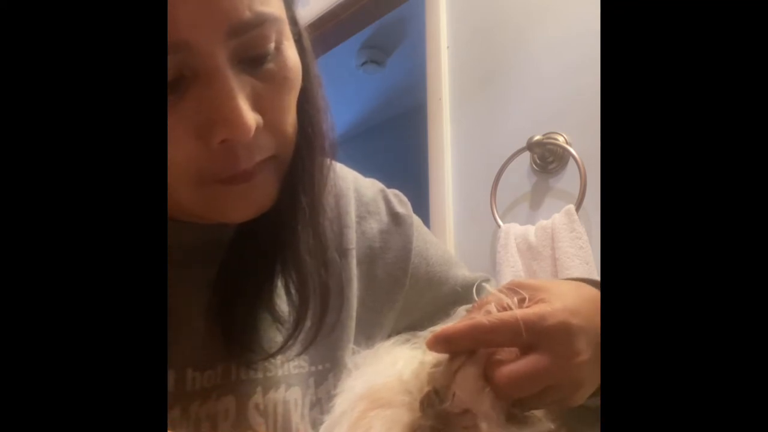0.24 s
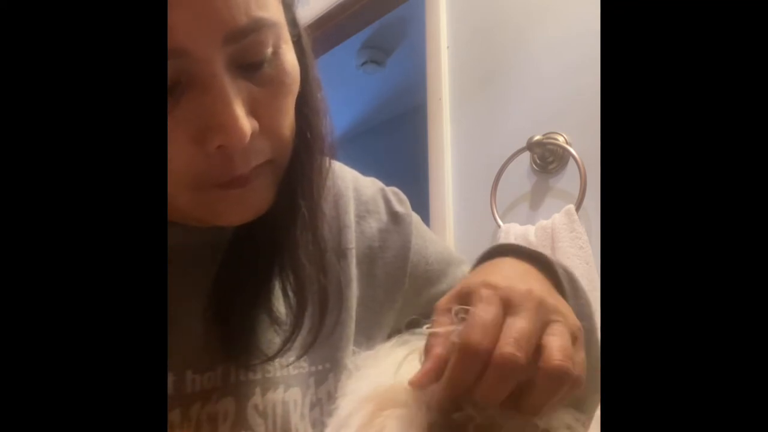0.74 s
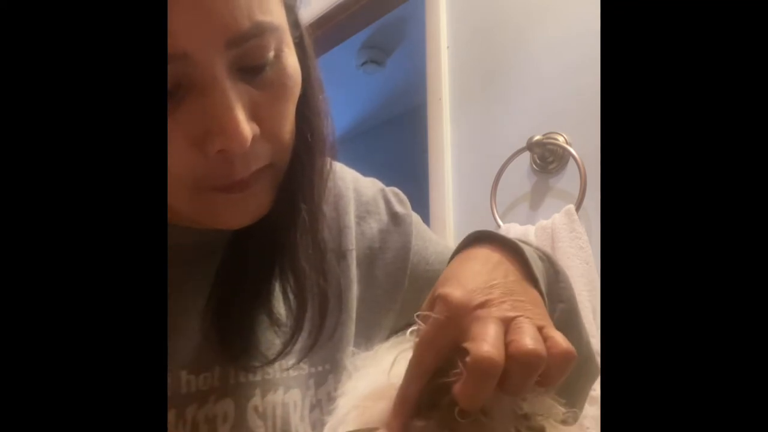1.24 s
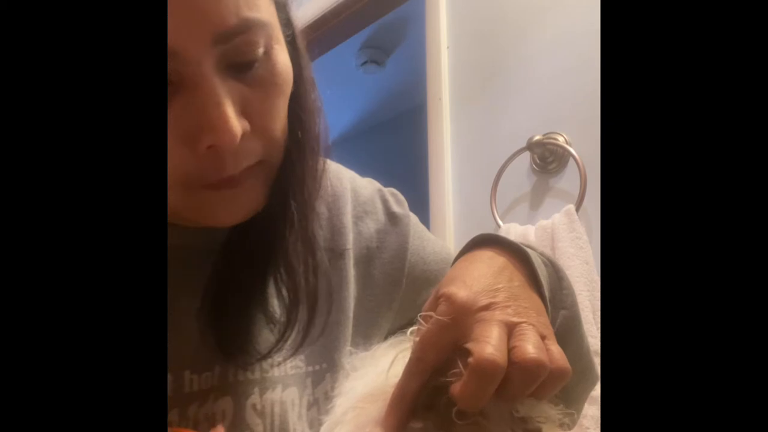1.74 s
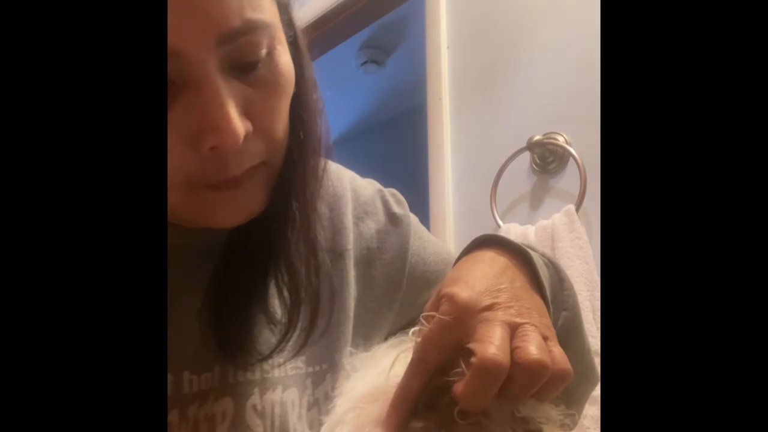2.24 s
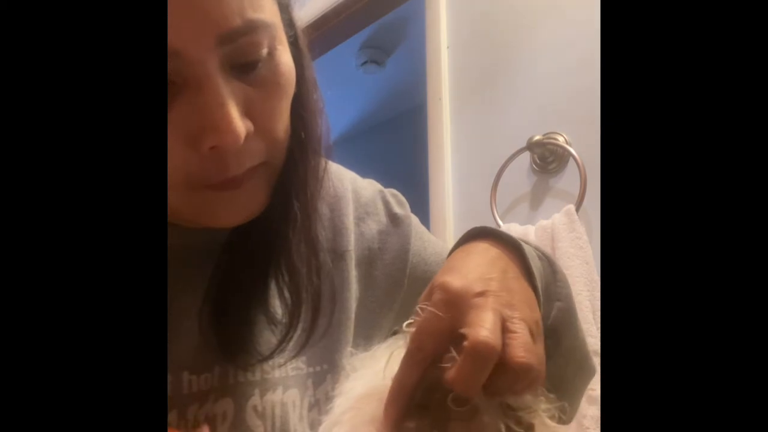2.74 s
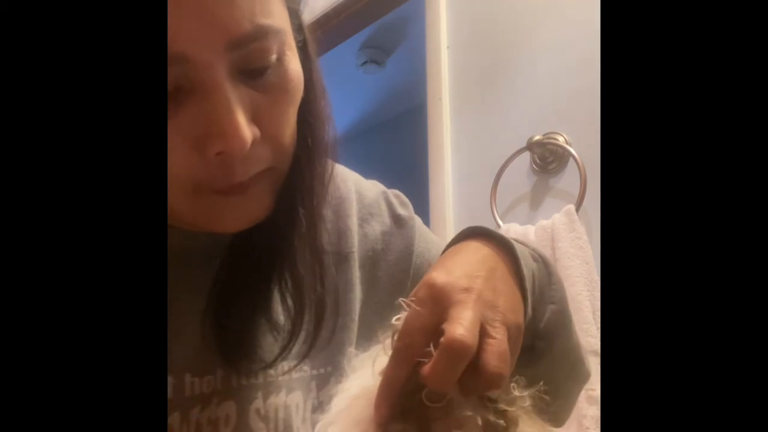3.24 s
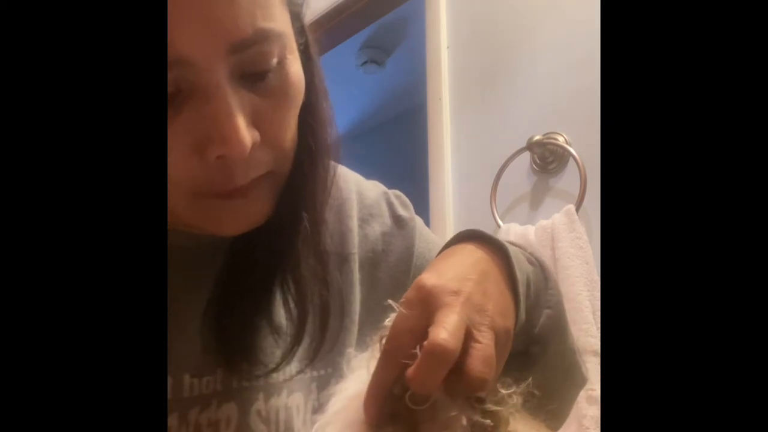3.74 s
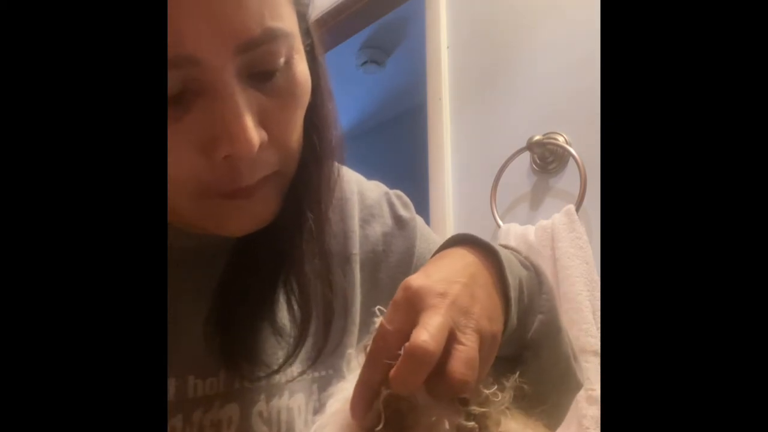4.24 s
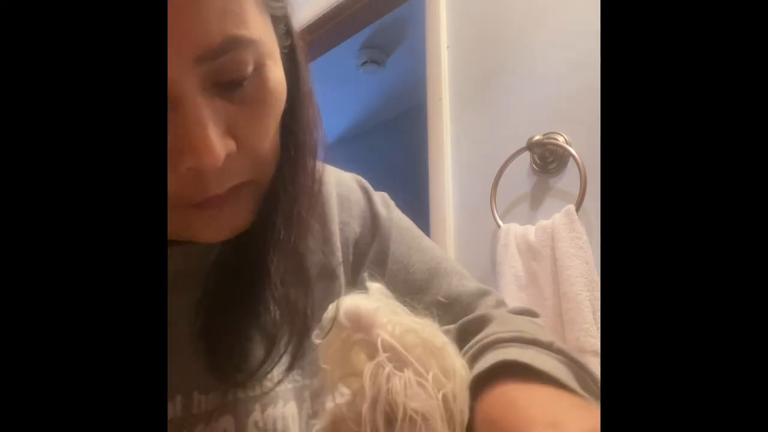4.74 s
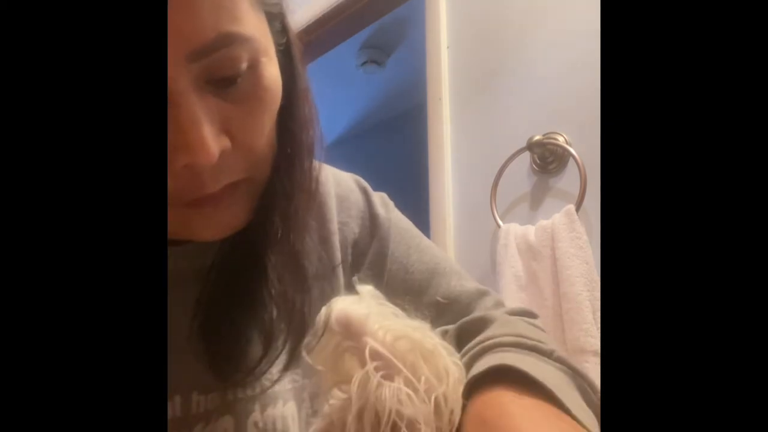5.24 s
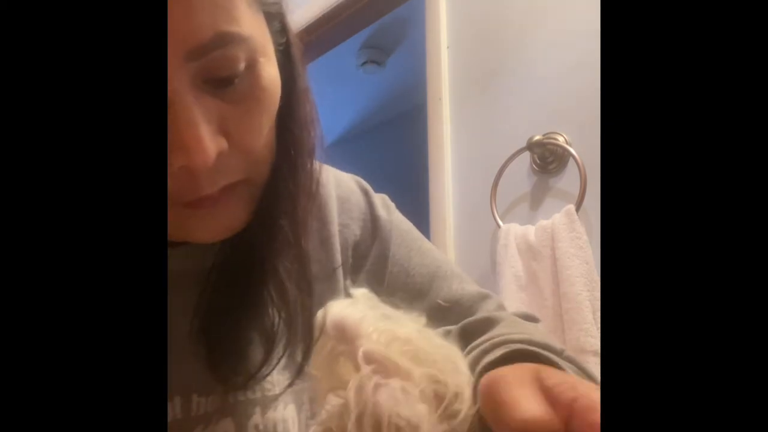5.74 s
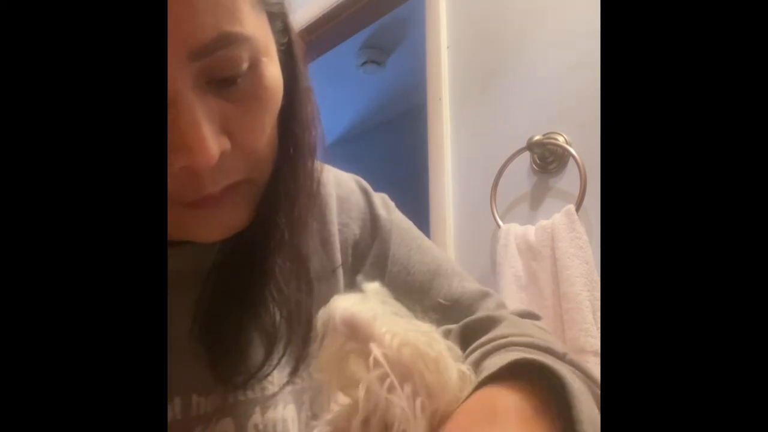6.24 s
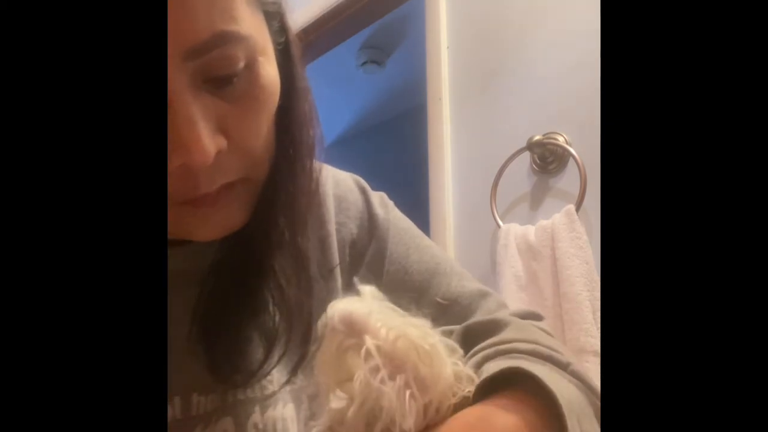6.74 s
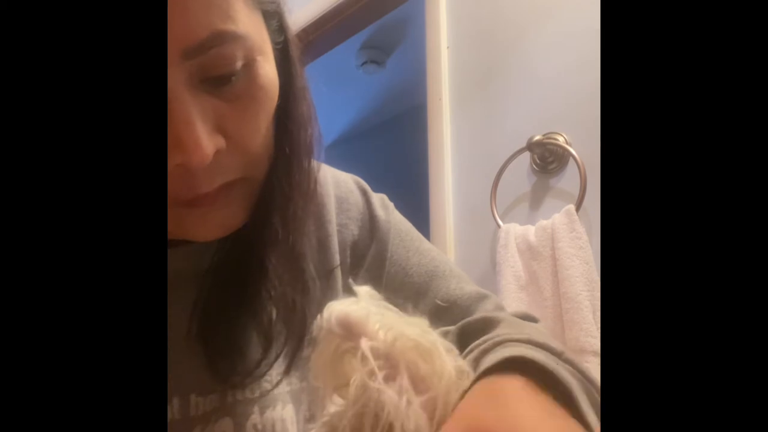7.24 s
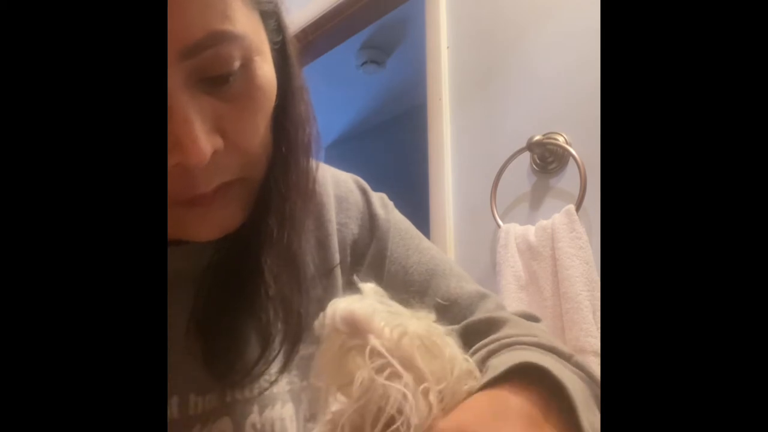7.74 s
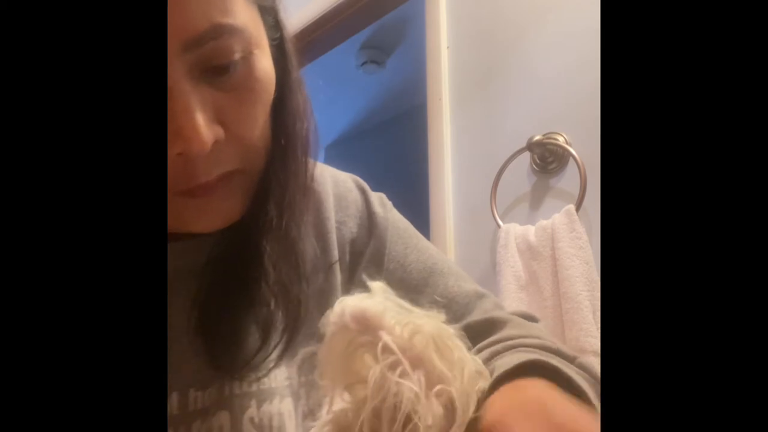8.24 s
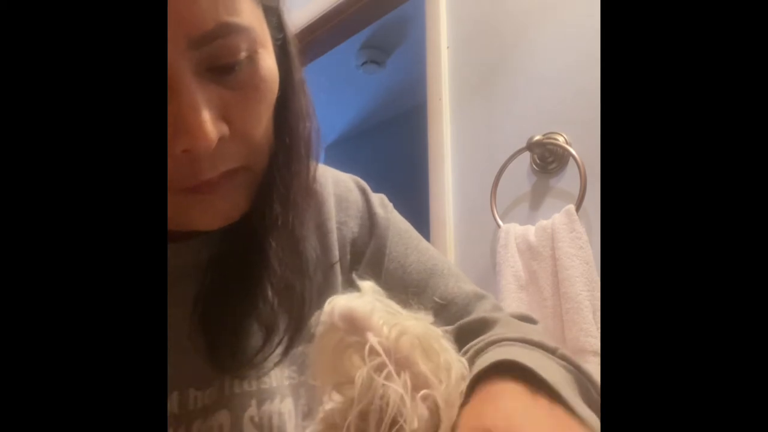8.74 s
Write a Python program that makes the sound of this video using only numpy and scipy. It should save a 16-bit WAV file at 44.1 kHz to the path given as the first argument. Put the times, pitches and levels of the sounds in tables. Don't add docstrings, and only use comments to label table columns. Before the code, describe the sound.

Three scissor cuts dominate the first half, each a short hairy rasp ending in a hard steel clack with a brief tiled echo, then a small reopening scrape. The second half is much quieter: airy fur strokes, dull hollow knocks, tiny metal ticks and a dog's low weight shifts. A steady fan hums and a muffled clock ticks beyond a door, all recorded close indoors.

```python
import sys
import numpy as np
from scipy import signal
from scipy.fft import rfft, irfft, next_fast_len
from scipy.io import wavfile
from scipy.ndimage import uniform_filter1d, map_coordinates

SR = 44100
rng = np.random.default_rng(int(sys.argv[2]) if len(sys.argv) > 2 else 0)


def persist_wave(psi):
    counts = np.round(np.clip(psi, -1, 1) * 32767).astype(np.int16)
    wavfile.write(sys.argv[1], SR, np.atleast_2d(counts).T)


def gain_from_db(level_db):
    decades = np.asarray(level_db, float) / 20
    return 10 ** decades


N = 396900

# (time [s], peak [dB], handle knock [dB], clack [Hz], tip brightness [dB])
SNAPS = [
    (0.0966, -10.5, -22.5, 3600, -2.5),
    (2.1686, -3.5, -21, 3100, 3),
    (4.0948, -3, -23, 3270, 2.5),
]
# (frequency [Hz], likeness [0-1])
PORT_LIKENESS = [(60, 1), (300, 0.5), (900, 0), (2200, 0.7), (3600, 0.4), (5200, 0), (6500, 0.6),
                 (9000, 0.7), (11500, 0.8), (13000, 0.95)]
# (time [s], half width [s], depth [dB])
SCENE_CHANGE = (4.671, .013, -24)


def unit(x):
    return x / np.sqrt(np.mean(x ** 2) + 1e-20)


def along(points, hz):
    f, v = np.transpose(points)
    return np.interp(np.log(hz + 1), np.log(f + 1), v)


def closed(spectrum):
    below = [(spectrum[0][0] * 0.6, -80)]
    above = [(spectrum[-1][0] * 1.07, -90)]
    return lambda hz: gain_from_db(along(below + list(spectrum) + above, hz))


def wobble(rate_hz):
    knots = rng.standard_normal(int(N * rate_hz / SR) + 4)
    return map_coordinates(knots, [np.arange(N) * rate_hz / SR])


def filtered(x, response):
    m = next_fast_len(x.shape[-1] + 8192)
    hz = np.fft.rfftfreq(m, 1 / SR)
    return irfft(rfft(x, m) * response(hz), m)[..., :x.shape[-1]]


def swells(rows, rise_s, fall_s, extra_db=0):
    start_s, hold_s, db = (c[:, None] for c in np.transpose(rows)[:3])
    t = np.arange(0, N + 32, 32) / SR
    loss = np.maximum(start_s - t, 0) / rise_s + np.maximum(t - start_s - hold_s, 0) / fall_s
    gain = gain_from_db(db + np.reshape(extra_db, (-1, 1)) - 20 * loss).sum(axis=0)
    return np.interp(np.arange(N) / SR, t, gain)


def rush(gains, patchy_db, grain_db=0):
    grains = rng.standard_normal((2, N)) * gain_from_db(grain_db * wobble(700))
    z = signal.stft(grains, nperseg=512)[2]
    field = uniform_filter1d(rng.standard_normal(z.shape[1:]), size=6, axis=0)
    field = uniform_filter1d(field, size=10, axis=1)
    patchy = signal.istft(z * gain_from_db(patchy_db * unit(field)), nperseg=512)[1]
    pair = rfft(patchy[:, :N])
    hz = np.fft.rfftfreq(N, 1 / SR)
    turn = np.arccos(np.clip(along(PORT_LIKENESS, hz), 0, 1)) / 2
    mid, side = pair * [np.cos(turn), np.sin(turn)]
    return [unit(irfft(gain(hz) * [mid + side, mid - side], N)) for gain in gains]


def ring(modes, t, rise_s):
    tones = 0
    for hz, db, t60_s in modes:
        tones = tones + gain_from_db(db + rng.normal(0, 2) - 60 * t / t60_s) * np.sin(2 * np.pi * hz * t)
    return tones * (1 - np.exp(-t / rise_s))


def echo(x):
    # (frequency [Hz], decay t60 [s])
    tile_decay = [(150, .5), (700, .3), (3000, 0.29), (8000, 0.23), (15000, 0.18)]
    hz, t, z = signal.stft(rng.standard_normal((2, SR // 3)), SR, nperseg=256)
    turn = np.arccos(np.clip(along(PORT_LIKENESS, hz), 0, 1))[:, None] * 0.16
    decay = gain_from_db(-60 * t / along(tile_decay, hz)[:, None])
    mid, side = z * decay * [np.cos(turn), np.sin(turn)]
    tail = signal.istft(np.array([mid + side, mid - side]), SR, nperseg=256)[1]
    delayed = np.pad(x, (150, 0))[None]
    return signal.fftconvolve(delayed, tail / np.linalg.norm(tail[0]), axes=1)


def add(out, sound, time_s, room_db):
    for part in (sound, gain_from_db(room_db) * echo(sound[0])):
        spot = out[:, round(time_s * SR):round(time_s * SR) + part.shape[1]]
        spot += part[:, :spot.shape[1]]


def fan():
    # (frequency [Hz], rms level [dB], unsteadiness [1/s])
    blade_tones = [(46.5, -73, 3.1), (94.5, -71.5, 12), (191.9, -60, 4.8), (371, -79, 14),
                   (576.5, -87.5, 6.8)]
    # (frequency [Hz], density [dB per Hz])
    air_spectrum = [(34, -7.5), (50, -4.5), (90, 1), (125, -2.5), (160, -7.5), (300, -12.5), (500, -18.5),
                    (750, -29.5), (1600, -34), (2300, -37.5), (4000, -40.5), (8000, -47), (13000, -49.5),
                    (15600, -52.5)]
    t = np.arange(N) / SR
    drift_s = np.cumsum(0.003 * wobble(2.8)) / SR
    hum = 0
    for hz, db, rate_hz in blade_tones:
        level = gain_from_db(db + 2.0 + 0.62 * wobble(rate_hz))
        hum = hum + level * np.sin(2 * np.pi * hz * (t + drift_s) + 0.27 * wobble(rate_hz))
    air = gain_from_db(-61 + 0.41 * wobble(3.3)) * rush([closed(air_spectrum)], patchy_db=2.07)[0]
    return hum * gain_from_db([[0.5], [-0.5]]) + air


def clock():
    # (frequency [Hz], density [dB per Hz])
    door_spectrum = [(700, -12), (950, 3), (1150, 0.5), (1400, 3), (1600, 2), (1900, 2), (2150, -33),
                     (2800, -7)]
    beats = []
    for first_s, db in ((0.548, -65.5), (1.515, -72.5)):
        for k in range(5):
            beat_s = first_s + 2 * k
            late_s = 0.095 * (beat_s > SCENE_CHANGE[0])
            beats.append((beat_s + late_s, 0.019, db))
    beat_gain = swells(beats, rise_s=0.048, fall_s=0.14)
    return gain_from_db(0.9 * wobble(30)) * beat_gain * rush([closed(door_spectrum)], patchy_db=0.5)[0]


def dog():
    # (start [s], hold [s], rumble [dB])
    weight_shifts = [(.06, 0.033, -51.5), (.23, 0.024, -67), (.55, 0.037, -63), (1.29, .03, -55),
                     (1.575, 0.01, -48.5), (1.65, .05, -60.5), (1.8, .03, -66), (1.98, 0.049, -55),
                     (2.17, .015, -48.5), (2.35, 0.045, -56), (2.82, 0.028, -52.5), (3.05, 0.018, -68),
                     (3.17, 0.028, -58.5), (3.9, 0.093, -63), (4.09, 0.027, -50.5), (4.26, .03, -63),
                     (4.69, 0.033, -59), (4.91, .02, -64.5), (5.6, 0.19, -60), (5.84, 0.025, -65),
                     (6.17, 0.044, -54.5), (6.64, .04, -58), (7.0, 0.017, -63.5), (7.264, 0.013, -53.5),
                     (7.64, .04, -60.5), (8.43, 0.035, -59), (8.77, 0.064, -54.5), (8.9, .1, -59.5)]
    rest_db, scuff_db = -69, -16
    belly = [(90, -3.0), (200, 2), (400, 3.5), (750, -7.0), (950, -15)]  # (Hz, dB per Hz)
    paws = [(900, 0), (1300, -4), (1900, -2)]  # (Hz, dB per Hz)
    rubbing, scuff = rush([closed(belly), closed(paws)], patchy_db=2.5)
    weight = swells(weight_shifts, rise_s=0.02, fall_s=0.083)
    rough = gain_from_db(-5.5 + 2.1 * wobble(25))
    return rough * ((weight + gain_from_db(rest_db)) * rubbing + gain_from_db(scuff_db) * weight * scuff)


def bumps():
    # (time [s], peak [dB], pitch [Hz], hollow knock [dB])
    knocks = [(1.291, -47, 91.5, -18), (1.573, -36.5, 128, -12), (1.64, -50.5, 110.1, -10),
              (1.983, -49, 92, -18), (2.367, -47, 90.6, -15), (2.804, -52, 193.6, -13.5),
              (4.912, -40, 199.7, -6.5), (5.748, -45.5, 91.2, -16.5), (5.826, -39, 216, -6.5),
              (6.172, -47.5, 99.6, -19.5), (6.269, -38.5, 215, -28.5), (6.657, -47.5, 87.6, -12),
              (7.262, -31, 226.5, 3), (7.627, -45, 128.3, -8), (7.665, -47, 195.7, 0),
              (8.254, -44, 196.6, -8.5), (8.775, -44.5, 91.5, -13.5), (8.917, -45.5, 111.4, -32)]
    # (frequency [Hz], level [dB], t60 [s])
    cavity_modes = [(430, 0, .06), (510, -10, .06)]
    bump_t60_s, shudder_db = 0.13, -12
    slap_db, slap_t60_s = -29, 0.027
    slab = closed([(55, -2.0), (90, -3), (150, 1), (280, -5)])
    skin = closed([(400, 2), (2600, -7.5)])
    out, t = np.zeros((2, N)), np.arange(SR // 4) / SR
    fade = gain_from_db(-60 * t / bump_t60_s) * (1 - np.exp(-t / 0.0051))
    sag_s = 0.0033 * (1 - np.exp(-t / 0.011))
    for time_s, db, hz, hollow_db in knocks:
        low = np.sin(2 * np.pi * hz * (t + sag_s))
        shudder = unit(filtered(rng.standard_normal(len(t)) * fade, slab) / (fade + 0.28))
        hollow = ring(cavity_modes, t, rise_s=0.003)
        slap = unit(filtered(rng.standard_normal(len(t)), skin))
        knock = fade * low + gain_from_db(shudder_db) * fade ** 0.64 * shudder + gain_from_db(hollow_db) * hollow
        knock = knock + gain_from_db(slap_db - 60 * t / slap_t60_s) * slap
        add(out, gain_from_db(db + 1) * knock[None], time_s, room_db=-10)
    return out * gain_from_db([[0.8], [-0.8]])


def strokes():
    # (start [s], hold [s], rustle [dB], brightness [dB])
    hand_strokes = [(0.486, 0.033, -82.5, 0), (.73, 0.0087, -88, 3), (1.288, 0.039, -82.5, -1),
                    (1.65, 0.021, -93, 5), (1.8, .02, -95, 9), (1.986, 0.053, -84.5, -5.5),
                    (2.808, 0.028, -90.5, -9), (3.165, 0.031, -82, 2.5), (3.876, 0.029, -87, 3.5),
                    (3.988, .02, -86, 5.5), (4.694, 0.014, -80, -0.5), (5.063, 0.065, -77.5, 0.5),
                    (5.223, 0.032, -80.5, 3.5), (5.761, 0.096, -79, -1.5), (6.032, 0.019, -73, -2),
                    (6.1, 0.1, -84, 0.5), (6.451, 0.071, -78.5, 1), (6.644, 0.024, -85, 7),
                    (6.732, 0.096, -84.5, 5), (6.899, 0.14, -79, -2), (7.157, 0.046, -80.5, 1),
                    (7.31, 0.042, -80.5, -0.5), (7.53, 0.081, -77, 0.5), (7.803, 0.05, -80.5, 4),
                    (8.052, 0.088, -80, 4), (8.392, 0.11, -77, 2.5), (8.618, 0.042, -79, 0.5),
                    (8.77, 0.093, -79.5, -7), (8.967, 0.035, -82, -11)]
    # (frequency [Hz], density [dB per Hz])
    fur_spectrum = [(1200, -1.5), (2500, -10.5), (3800, -1), (5000, -7.5), (7000, -8), (9000, -7),
                    (12000, -2), (14000, 3), (15200, -8)]
    fur = closed(fur_spectrum)
    below = lambda hz: fur(hz) / np.hypot(1, (hz / 7000) ** 2)
    above = lambda hz: fur(hz) / np.hypot(1, (7000 / (hz + 1)) ** 2)
    dull, bright = rush([below, above], patchy_db=1.5, grain_db=2)
    tilt_db = np.transpose(hand_strokes)[3]
    dull_gain = swells(hand_strokes, 0.052, 0.1, -tilt_db)
    bright_gain = swells(hand_strokes, 0.052, 0.1, tilt_db + 2)
    flutter_db = 1.2 * wobble(35)
    return gain_from_db(1.5 + flutter_db) * (dull_gain * dull + bright_gain * bright)


def slides():
    # (start [s], hold [s], shear [dB], handle rub [dB], edge brightness [dB])
    closings = [
        (0.0, 0.019, -79.5, 3, 5),
        (0.052, .043, -62, -3, 7),
        (2.065, .04, -83, 5, 3),
        (2.11, 0.058, -62.5, -2.5, 3.5),
        (4.052, .04, -64, 4.5, 7),
    ]
    # (start [s], hold [s], shear [dB], handle rub [dB], edge brightness [dB])
    reopenings = [
        (0.228, 0.021, -62.5, -0.5, 1.5),
        (0.27, 0.016, -71, -1, 6.3),
        (2.343, 0.016, -66, 7.5, 2.5),
        (2.381, 0.0069, -64, -6, 1.8),
        (4.256, 0.0065, -68, 6, 2.1),
        (4.285, 0.013, -69, 2.5, 6.3),
    ]
    # (frequency [Hz], width [Hz], level [dB])
    edge_modes = [(2440, 310, -3), (3153, 400, -4.5), (4330, 340, 3), (8400, 510, 1.5), (11100, 490, -0.5),
                  (13700, 1400, -5)]
    # (frequency [Hz], density [dB per Hz])
    rub_spectrum = [(450, -6.5), (850, 1), (1150, -16.5), (1700, -18)]
    bite_db, bite_bright_db = -40, -6

    def steel(hz):
        return 0.04 + sum(gain_from_db(db) * w / np.hypot(2 * (hz - c), w) for c, w, db in edge_modes)

    low_edge = lambda hz: steel(hz) * (hz > 1300) * (hz < 6500)
    high_edge = lambda hz: steel(hz) * (hz > 6500) * (hz < 16300)
    low, high, rub = rush([low_edge, high_edge, closed(rub_spectrum)], patchy_db=2.5, grain_db=3.5)
    bites = [(time_s, 0, db + bite_db) for time_s, db, *_ in SNAPS]
    out = swells(bites, rise_s=0.03, fall_s=0.01) * (low + gain_from_db(bite_bright_db) * high)
    for rows, rise_s in ((closings, 0.035), (reopenings, 0.0111)):
        *_, rub_db, bright_db = np.transpose(rows)
        for share_db, noise in ((0, low), (bright_db, high), (rub_db, rub)):
            out = out + swells(rows, rise_s, 0.042, share_db) * noise
    flutter_db = 1.2 * wobble(120)
    return gain_from_db(4.5 + flutter_db) * out


def clicks(hits, swell_s, crack_t60_s, steel_db, clack_db, chatter_db, room_db):
    # (frequency [Hz], level [dB], t60 [s])
    blade_modes = [(3140, -6, .03), (5870, -8, .03), (7690, 0, .03), (8280, -3, .1), (8950, -8, .06),
                   (11320, -6, .03)]
    # (frequency [Hz], level [dB], t60 [s])
    handle_modes = [(467, -7, 0.039), (735, 0.5, 0.029), (1020, -4.5, .02), (1367, -0.5, .025)]
    # (frequency [Hz], density [dB per Hz])
    crack_spectrum = [(900, -15), (1400, -10), (2000, -12), (3200, -3), (4600, -2), (6000, -3), (8200, 0),
                      (10000, -3), (12000, -1), (14500, -11), (16300, -18)]
    crack = closed(crack_spectrum)
    out, t = np.zeros((2, N)), np.arange(SR // 8) / SR
    after = np.maximum(t - swell_s, 0)
    swell = gain_from_db(-4 + 26 * (t / swell_s - 1))
    blow = np.where(t < swell_s, swell, gain_from_db(-60 * after / crack_t60_s))
    chatter = gain_from_db(-60 * after / 0.06) * (t > swell_s)
    for time_s, db, knock_db, clack_hz, tip_db in hits:
        noise = rng.standard_normal(len(t)) + 0.14 * rng.standard_normal((2, len(t)))
        noise[:, round(swell_s * SR) + 1] += 3.2
        colour = [(0.7 * clack_hz, -3), (clack_hz, clack_db), (1.3 * clack_hz, -3), (8000, 0), (12000, tip_db + 2)]
        response = lambda hz: crack(hz) * gain_from_db(along(colour, hz)) * (hz > 900)
        clack = filtered((blow + gain_from_db(chatter_db) * chatter) * noise, response)
        handles = ring(handle_modes, after, rise_s=0.001)
        blades = ring(blade_modes, after, rise_s=0.00035)
        body = gain_from_db(steel_db) * blades + gain_from_db(knock_db - 1.5) * handles
        hit = gain_from_db(db + 2) * (clack / np.abs(clack).max() + body)
        add(out, hit, time_s - swell_s + 0.0017, room_db)
    return out


def scene():
    # (time [s], peak [dB], handle knock [dB], clack [Hz], tip brightness [dB])
    small_ticks = [(0.051, -42, -16, 3000, -8), (0.2284, -49, -18, 3010, -6),
                   (1.5722, -36, -2.5, 4440, -9.5), (2.3408, -35.5, -28, 4500, -2),
                   (2.381, -46.5, -14, 4180, -5), (4.069, -61.5, 19, 3320, -7),
                   (4.258, -57.5, -4.5, 3470, -7), (4.297, -57, -7, 4400, 4), (7.003, -66, 8.5, 3685, 0.5),
                   (7.3022, -58.5, -13, 3700, -3), (7.626, -55.5, 4, 3960, 3),
                   (8.7744, -57.5, -2, 3100, -2)]
    background = fan() + clock() + dog()
    hand = bumps() + strokes()
    snaps = clicks(SNAPS, swell_s=0.002, crack_t60_s=0.018, steel_db=-28, clack_db=0.0,
                   chatter_db=-8, room_db=-16.5)
    ticks = clicks(small_ticks, swell_s=0.0004, crack_t60_s=0.0068, steel_db=-36.5, clack_db=6,
                   chatter_db=-7.5, room_db=-13.5)
    return background + hand + slides() + snaps + ticks


def top_cut(x):
    return signal.sosfilt(signal.butter(12, 17060, fs=SR, output="sos"), x)


def record(dry):
    # (frequency [Hz], left over right [dB])
    left_lean = [(200, -0.5), (1500, 1.5), (3000, 1), (4700, 2), (7000, 0)]
    # (frequency [Hz], phase by which left leads [rad])
    left_lead = [(0, 0), (750, .2), (1200, 4.2), (1700, 5.1), (2300, 4.1), (3500, 4.9), (4900, 4.5),
                 (6300, 6.2), (7000, 6.1), (13000, 3.2), (17000, 3.1)]

    def half(hz):
        return np.log(gain_from_db(along(left_lean, hz))) / 2 + 0.5j * np.interp(hz, *np.transpose(left_lead))

    ports = filtered(dry, lambda hz: np.exp([half(hz), -half(hz)]))
    soft = ports / (1 + np.abs(ports / 0.95) ** 8) ** (1 / 8)
    change_s, half_width_s, depth_db = SCENE_CHANGE
    nearness = np.clip(1 - np.abs(np.arange(N) / SR - change_s) / half_width_s, 0, 1)
    return top_cut(soft * gain_from_db(depth_db * nearness))


dry = scene()
out = record(dry)
persist_wave(out)
```